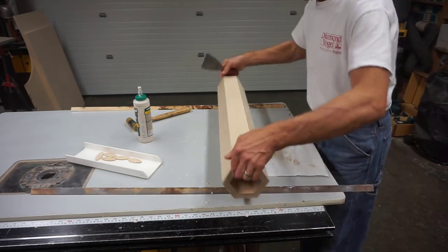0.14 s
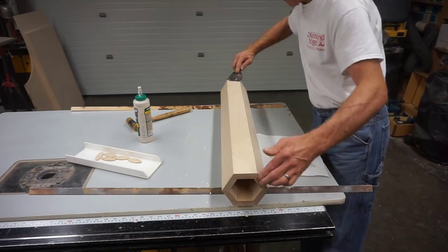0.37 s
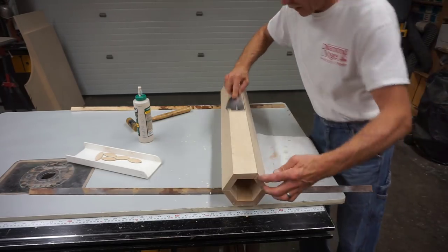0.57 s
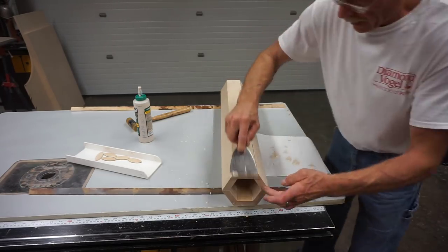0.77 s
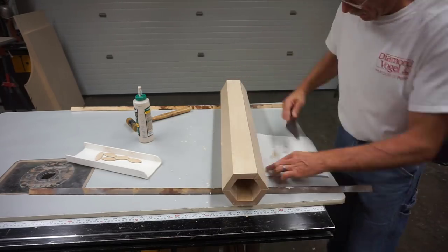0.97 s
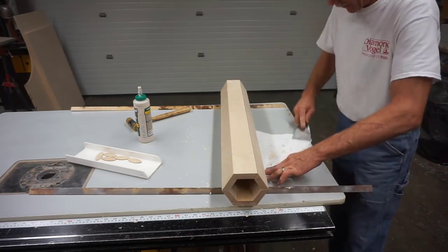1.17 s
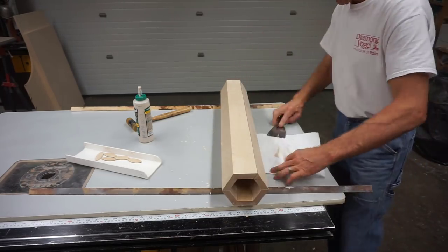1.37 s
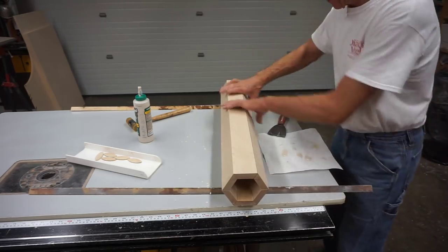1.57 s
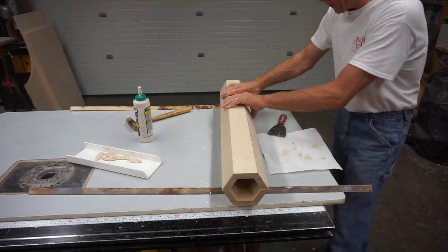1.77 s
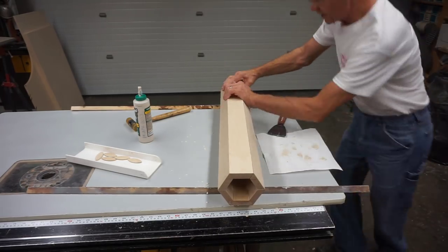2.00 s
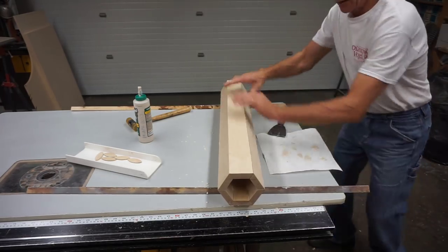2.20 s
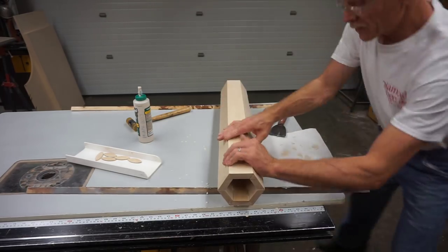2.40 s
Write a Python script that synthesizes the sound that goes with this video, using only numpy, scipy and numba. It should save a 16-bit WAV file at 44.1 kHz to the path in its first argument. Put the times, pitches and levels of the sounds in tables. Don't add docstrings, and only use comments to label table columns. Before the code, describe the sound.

A putty knife scraping a hollow wooden tube: a sharp cluster of knocks at 0.25 s, then a thin, hissy metallic scrape from 0.4 to 0.85 s, rising slightly in pitch. A light click at 1.1 s and faint paper rustles follow; the knife clatters onto the bench around 1.45 s. Soft hand rubs lead to two crisp wooden knocks at 2.03 and 2.11 s. Short workshop echo, bright, bassless close pickup.

```python
import sys
import numpy as np
from scipy import signal
from scipy.fft import rfft, irfft
from scipy.io import wavfile
from scipy.ndimage import uniform_filter1d
from numba import njit

SR = 44100
rng = np.random.default_rng(int(sys.argv[2]) if len(sys.argv) > 2 else 0)


def magnitude_from_level(level_db):
    exponent = np.asarray(level_db, float) / 20
    return 10 ** exponent


def int16_out(signal):
    q = np.round(np.clip(np.atleast_2d(signal).T, -1, 1) * 32767)
    wavfile.write(sys.argv[1], SR, q.astype(np.int16))


N = 108045


def level(x):
    return x / np.sqrt(np.mean(x ** 2))


def read(table, hz):
    table_hz, value = np.array(table).T
    return np.interp(np.log(np.maximum(hz, 1)), np.log(table_hz), value)


def colour(x, table):
    n = x.shape[-1]
    return irfft(rfft(x) * magnitude_from_level(read(table, np.fft.rfftfreq(n, 1 / SR))), n)


@njit
def svf(x, hz, width):
    y, b, l = np.empty(len(x)), 0., 0.
    for i in range(len(x)):
        g, k = np.tan(np.pi * hz[i] / SR), width / hz[i]
        v = (b + g * (x[i] - l)) / (1 + g * (g + k))
        b, l, y[i] = 2 * v - b, l + 2 * g * v, k * v
    return y


def band(x, hz, width):
    return svf(x, np.full(len(x), min(1. * hz, .4 * SR)), 1. * width)


def walk(rate_hz):
    hold = int(SR / rate_hz)
    steps = np.repeat(rng.standard_normal(N // hold + 1), hold)
    return level(uniform_filter1d(steps, hold)[:N])


def grit(grain_db, patchy_db, rate_hz):
    grain = grain_db * rng.exponential(size=N)
    return level(rng.standard_normal(N) * magnitude_from_level(grain + patchy_db * walk(rate_hz)))


def swell(t, peak_s, rise_s, fall_s):
    return np.exp(-.5 * ((t - peak_s) / np.where(t < peak_s, rise_s, fall_s)) ** 2)


def ring(modes, chance, t):
    scatter_db, detune = 5, .015
    hz, db, t60 = np.array(modes).T[:, :, None]
    strength, tuning = chance[:, :len(modes), None]
    tone = np.sin(2 * np.pi * hz * (1 + detune * tuning) * t)
    return (magnitude_from_level(db + scatter_db * strength) * tone * np.exp(-np.log(1000) * t / t60)).sum(0)


# pitch_hz, density_db (per Hz)
HUSH_TONE = [(88, -63), (150, -60), (391, -27.5), (979, 7), (1260, 4), (2450, 3), (14200, -2.5),
             (16000, -4.5)]
# pitch_hz, level_db
ROOM_SIDE = [(300, -21), (500, -17), (1000, -14), (2000, -8), (4000, -5), (8000, -2), (13000, -3.5)]


def hush():
    level_db, flicker_db = -62, 1.5
    mid, side = colour(rng.standard_normal((2, N)), HUSH_TONE)
    side = colour(side, ROOM_SIDE)
    return magnitude_from_level(level_db + flicker_db * walk(9.73)) * np.array([mid + side, mid - side]) / np.std(mid)


# start_s, pitch_hz, level_db, t60_s
TOUCH_MODES = [(.03, 3710, -58, 0.15), (0.378, 2487, -41, 0.081), (.376, 3170, -55, 0.046),
               (.43, 2420, -46, 0.07), (1.231, 6500, -46, 0.08), (1.231, 1980, -50.5, 0.11),
               (1.3, 1974, -60.5, 0.76), (1.28, 5400, -54, 0.14), (1.28, 6500, -48, 0.13),
               (1.352, 1600, -46, 0.1), (1.356, 2006, -46, 0.17), (1.4216, 5740, -31.5, 0.022),
               (1.4502, 1932, -44, 0.32), (1.87, 6220, -42.5, 0.18), (1.871, 4500, -44.5, 0.072),
               (2.031, 9520, -25.5, 0.021), (2.03, 534, -45, 0.16), (2.03, 828, -42.5, 0.088),
               (2.03, 632, -36, 0.11), (2.03, 705, -42.5, 0.5), (2.03, 947, -50, 0.14),
               (2.113, 648, -34.5, 0.13), (1.086, 372, -56, .05), (2.1125, 9430, -28, 0.019)]


def pings():
    pair_ratio, pair_db = 1.006, -10
    out, t = np.zeros(N + SR), np.arange(SR // 2) / SR
    for start_s, hz, db, t60 in TOUCH_MODES:
        pair = [(hz, db, t60), (hz * pair_ratio, db + pair_db, t60)]
        i = int(start_s * SR)
        out[i:i + len(t)] += ring(pair, np.zeros((2, 2)), t)
    return out[:N]


# pitch_hz, t60_s
ROOM_T60 = [(400, 0.41), (1000, 0.19), (5000, 0.22), (15000, 0.19)]
# pitch_hz, level_db
ROOM_TONE = [(300, -3), (650, -2), (950, 6), (2000, -2), (5000, -1), (9000, 0), (15000, 7)]


def shop():
    build_s, gap_s, grain_db, dense_s = .002, .0005, 4, .03
    t = np.arange(SR // 2) / SR
    late = np.maximum(t - gap_s, 0)
    sparse_db = grain_db * rng.exponential(size=len(t)) * np.exp(-t / dense_s)
    echoes = rng.standard_normal((2, len(t))) * magnitude_from_level(sparse_db)

    def decay(noise):
        wash = 0
        for hz in 300 * 2 ** np.arange(0, 6, .5):
            fade = np.exp(-np.log(1000) * late / read(ROOM_T60, hz))
            wash = wash + magnitude_from_level(read(ROOM_TONE, hz)) * band(noise, hz, hz * .5) * fade
        return wash * (1 - np.exp(-late / build_s))

    mid, side = decay(echoes[0]), colour(decay(echoes[1]), ROOM_SIDE)
    return np.array([mid + side, mid - side]) / np.sqrt(np.sum(mid ** 2))


# pitch_hz, level_db, t60_s
TUBE_MODES = [(226, -5.5, 0.023), (415, -12.5, 0.062), (581.6, -22, 0.15), (635, -9.5, 0.064),
              (800, -8.5, 0.02), (908, -4.5, 0.026), (1005, 0.5, 0.041), (1247, -6.5, 0.01),
              (1446, -18.5, 0.023), (1760, -15, 0.01), (1980, -4.5, 0.058), (2360, -7.5, 0.054)]


def tube_body(x):
    return level(sum(magnitude_from_level(db) * level(band(x, hz, 1.7 / t60 * 2)) for hz, db, t60 in TUBE_MODES))


# peak_s, rise_s, fall_s, level_db, centre_hz
RUB_STROKES = [(.04, 0.046, 0.035, -58, 3970), (0.088, 0.0026, 0.0082, -45, 9300),
               (0.148, 0.047, 0.0077, -52.5, 2470), (0.246, 0.0038, 0.012, -22.5, 7200),
               (0.279, 0.011, 0.021, -25.5, 4600), (.96, 0.013, 0.038, -56, 8000),
               (1.13, 0.025, 0.068, -50, 7650), (1.229, 0.012, 0.008, -37, 9300),
               (1.376, 0.019, 0.023, -42, 8060), (1.5, 0.02, 0.029, -50, 11000),
               (1.636, 0.025, 0.015, -50, 6400), (1.684, 0.021, 0.035, -51, 7240),
               (1.796, 0.012, 0.039, -44, 12200), (1.889, 0.011, 0.029, -44.5, 7300),
               (1.95, .03, 0.031, -53, 6900), (2.01, 0.0068, 0.044, -50, 6240),
               (1.04, 0.018, 0.041, -62, 7840), (2.085, 0.041, 0.023, -57, 10700),
               (2.23, 0.18, 0.014, -52, 5760), (2.372, 0.011, 0.012, -48.5, 6800)]
# peak_s, rise_s, fall_s, level_db
TUBE_DRAGS = [(.1, 0.025, 0.037, -55.5), (.16, 0.013, 0.008, -57), (0.243, 0.0029, 0.012, -31),
              (0.271, 0.0045, 0.044, -34.5), (0.397, 0.054, 0.0028, -54), (0.842, 0.0067, 0.012, -48),
              (1.102, 0.0089, 0.027, -56.5), (1.138, 0.027, 0.0072, -51), (1.379, 0.0078, 0.081, -54.5),
              (1.66, 0.021, 0.03, -50), (1.9, 0.013, 0.03, -46), (1.958, 0.015, 0.2, -53),
              (2.237, 0.024, 0.0044, -56.5), (2.37, 0.0077, 0.023, -52.5)]


def rubs(t):
    paper = grit(2.2, 1.2, 250)
    rustle = 0
    for peak_s, rise_s, fall_s, db, hz in RUB_STROKES:
        rustle = rustle + magnitude_from_level(db) * swell(t, peak_s, rise_s, fall_s) * level(band(paper, hz, hz / .46))
    pressure = sum(magnitude_from_level(db) * swell(t, peak_s, rise_s, fall_s) for peak_s, rise_s, fall_s, db in TUBE_DRAGS)
    return rustle + tube_body(grit(0.62, 1.83, 59.6)) * pressure


# start_s, click_db, centre_hz, width_hz, tube_db
CONTACTS = [(0.2376, -18, 7400, 12000, -46), (0.2447, -10.5, 6170, 6400, -45),
            (.262, -15, 2250, 3600, -40.5), (0.641, -23.5, 7940, 9100, -65.5),
            (.83, -25, 4350, 8500, -53.5), (1.0866, -26, 3840, 13400, -48.5),
            (1.231, -35.5, 6930, 8900, -64.5), (1.281, -33.5, 6600, 4000, -79),
            (1.35, -37.5, 2140, 1480, -64), (1.4222, -16, 2870, 2310, -56), (1.4332, -27, 3900, 3000, -67),
            (1.4505, -9.5, 4800, 5460, -46), (1.464, -11, 5000, 3840, -43),
            (1.468, -15.5, 1930, 1760, -43.5), (1.654, -23, 6500, 8700, -74),
            (1.868, -34.5, 6300, 3000, -58.5), (1.972, -33, 6300, 3950, -62), (2.027, -35, 2470, 2500, -77),
            (2.0296, -12, 3260, 11400, -35), (2.0898, -26, 2700, 4100, -54),
            (2.1129, -11.5, 5300, 15300, -35.5), (2.122, -16.5, 5160, 3420, -59),
            (2.126, -14.5, 3210, 4700, -48)]
# start_s, level_db, centre_hz, width_hz
BOUNCES = [(0.2506, -18.5, 5800, 4000), (0.265, -19, 2530, 3530), (.277, -26.5, 2500, 3000),
           (0.281, -16, 5740, 3000), (.2885, -14.5, 2970, 9500), (.376, -40, 2650, 1200),
           (1.358, -45, 1950, 920), (1.4185, -43, 1820, 2000), (1.459, -20, 5800, 1990),
           (1.4708, -17, 5480, 1800), (1.454, -15, 4400, 4030), (1.475, -15, 2380, 2420),
           (1.4782, -19, 6140, 1970), (1.49, -22, 5760, 2050), (2.032, -28, 1480, 2500),
           (2.1147, -14.5, 2280, 2210), (2.127, -13, 4700, 3970)]
# pitch_hz, level_db, t60_s
BENCH_THUMP = [(106, 6, 0.044)]
ROOM_SEND_DB = 6


def knocks():
    click_s, crack_s, crack_db, tick_wet_db = .00012, .0014, -4.5, -1.5
    out, t = np.zeros((2, N + SR)), np.arange(SR // 8) / SR
    chance = rng.standard_normal((40, 2, 14))
    noise = rng.standard_normal((40, len(t)))

    def burst(x, hz, width):
        y = band(band(x, hz, width), hz, width)
        return y / np.abs(y).max()

    for (start_s, db, hz, width, tube_db), c, n in zip(CONTACTS, chance, noise):
        click = burst((2 + n) * np.exp(-t / click_s), hz, width)
        crack = burst(n * np.exp(-t / crack_s), hz, width)
        i = int(start_s * SR)
        out[0, i:i + len(t)] += magnitude_from_level(db) * click + magnitude_from_level(tube_db) * ring(TUBE_MODES + BENCH_THUMP, c, t)
        out[1, i:i + len(t)] += magnitude_from_level(db + crack_db) * crack
    for (start_s, db, hz, width), n in zip(BOUNCES, noise[len(CONTACTS):]):
        tick = burst((1 + n) * np.exp(-t / crack_s * 2), hz, width)
        i = int(start_s * SR)
        out[:, i:i + len(t)] += magnitude_from_level([[db + tick_wet_db - ROOM_SEND_DB], [db]]) * tick
    return out[:, :N]


# time_s, level_db, chatter_hz, tube_load_db
SCRAPE_STROKE = [
    (0.416, -49, 5860, -6),
    (0.438, -40.5, 6070, -32),
    (0.522, -34, 5940, -50.5),
    (0.6, -31, 6400, -28.5),
    (0.637, -27.5, 6640, -34),
    (.69, -34, 7170, -50),
    (.76, -33, 7060, -29.5),
    (0.833, -29.5, 7400, -38),
    (0.864, -63, 7550, -7),
]
# pitch_hz, width_hz, level_db, climb (exponent following the chatter)
BLADE_BANDS = [(4890, 260, -5.5, .42), (12800, 600, -1, .2), (2047, 200, -14.5, 0), (2440, 330, -8.5, 0),
               (3000, 250, -16, 0), (8050, 330, -5, .12), (8900, 900, -8, .1), (13000, 2400, -3, .2)]
# pitch_hz, density_db (per Hz)
BLADE_HISS = [(410, -54), (700, -67), (2430, -11), (5610, -8.5), (6920, -5.5), (13100, -6), (16000, -26)]


def scrape(t):
    chatter_db, hiss_db, flicker_db = 5.5, 4.5, 4.2
    time_s, level_db, chatter_hz, load_db = np.array(SCRAPE_STROKE).T
    edge = grit(2.07, 3, 200)
    pitch_hz = np.interp(t, time_s, chatter_hz)
    bands = 0
    for hz, width, db, climb in BLADE_BANDS:
        flicker = magnitude_from_level(db + flicker_db * walk(40.24))
        centre_hz = hz * (pitch_hz / 6600) ** climb * (1 + .015 * walk(24.7))
        bands = bands + flicker * level(svf(edge, centre_hz, 1. * width))
    grip = np.clip((t - .62) / 0.048, .15, 1)
    chatter = grip * magnitude_from_level(chatter_db + flicker_db * walk(60.25)) * level(svf(edge, pitch_hz, 450.))
    steel = level(bands + chatter + magnitude_from_level(hiss_db) * level(colour(edge, BLADE_HISS)))
    wood = magnitude_from_level(np.interp(t, time_s, load_db) + 2.9 * walk(28.4)) * tube_body(edge)
    return magnitude_from_level(np.interp(t, time_s, level_db, left=-120, right=-120)) * (steel + wood)


# pitch_hz, level_db
RIGHT_LEAN = [(400, -27), (1500, -37), (3500, -18), (15000, -15)]


def scene():
    ping_wet_db, friction_wet_db, place_turns_per_s = -4, -3.5, 1.3
    t = np.arange(N) / SR
    hits, cracks = knocks()
    steel = pings()
    friction = magnitude_from_level(-2.5) * (rubs(t) + scrape(t))
    near = hits + cracks + steel + friction
    sent = magnitude_from_level(ROOM_SEND_DB) * hits + magnitude_from_level(ping_wet_db) * steel + magnitude_from_level(friction_wet_db) * friction
    place = 2 * np.pi * place_turns_per_s * t
    wash = 0
    for share in (np.cos(place), np.sin(place)):
        wash = wash + signal.fftconvolve((share * sent)[None], shop(), axes=1)[:, :N]
    return near + colour(near, RIGHT_LEAN) * np.array([[-1], [1]]) + wash + hush()


def low_pass(x):
    return signal.sosfilt(signal.butter(12, 16810, fs=SR, output="sos"), x)


def record(dry):
    low_hz, top_hz = 406, 15600
    x = signal.sosfilt(signal.butter(3, low_hz, "high", fs=SR, output="sos"), dry)
    x = signal.sosfilt(signal.ellip(8, .2, 45, top_hz, fs=SR, output="sos"), x)
    return low_pass(x)


dry = scene()
out = record(dry)
int16_out(out)
```